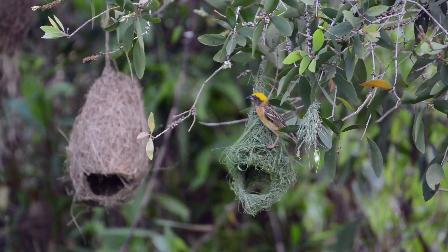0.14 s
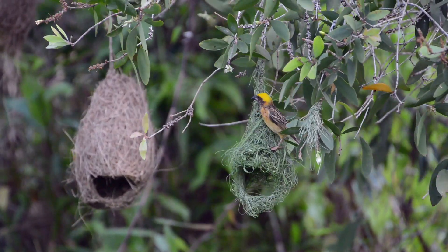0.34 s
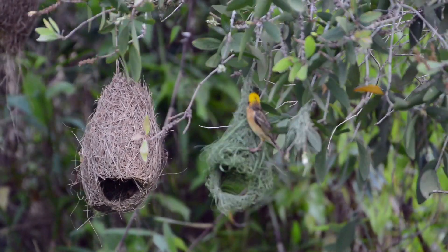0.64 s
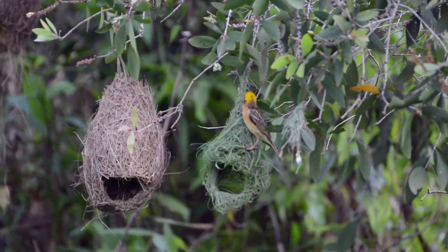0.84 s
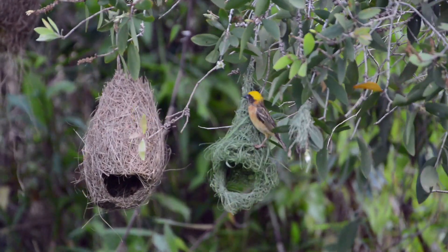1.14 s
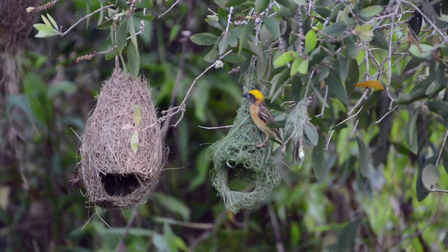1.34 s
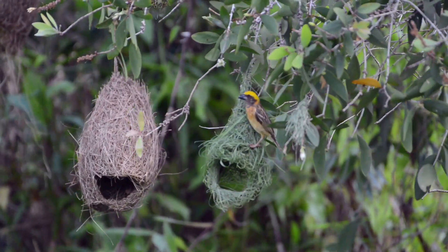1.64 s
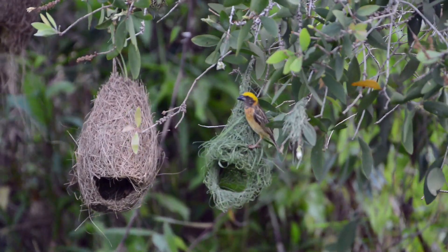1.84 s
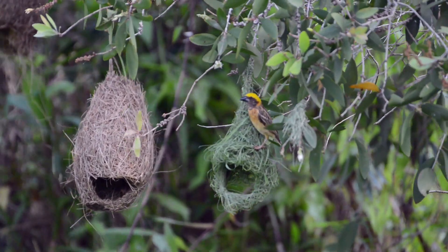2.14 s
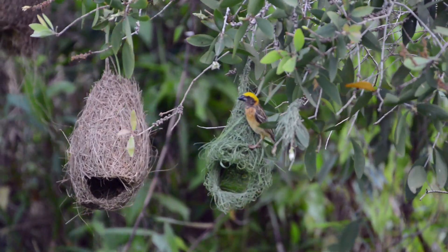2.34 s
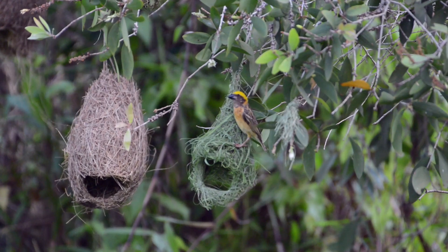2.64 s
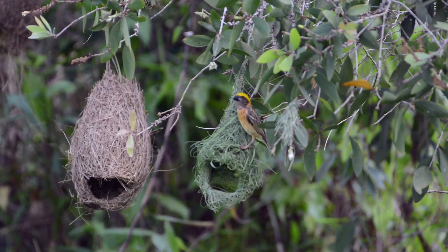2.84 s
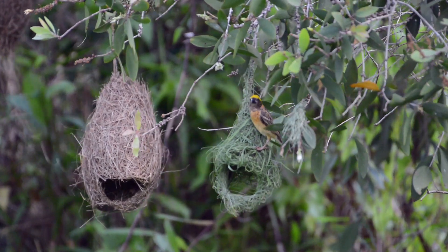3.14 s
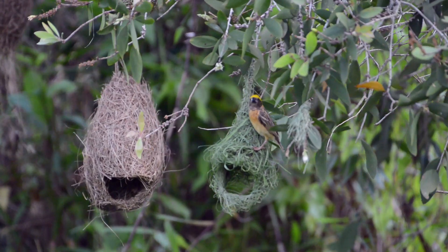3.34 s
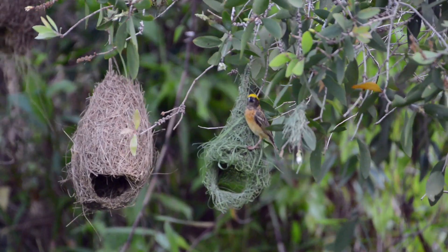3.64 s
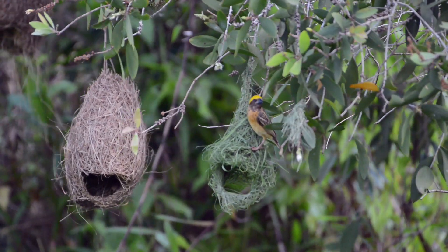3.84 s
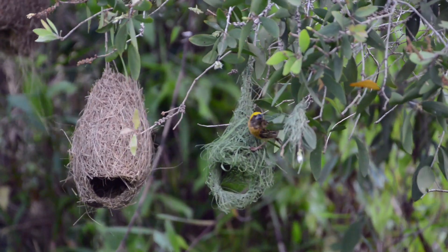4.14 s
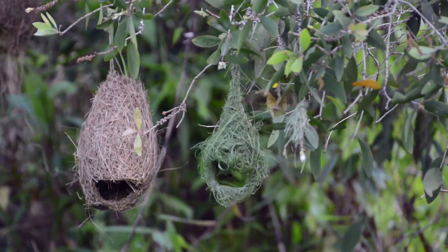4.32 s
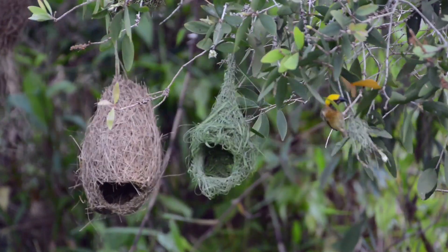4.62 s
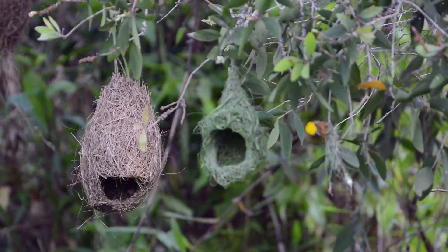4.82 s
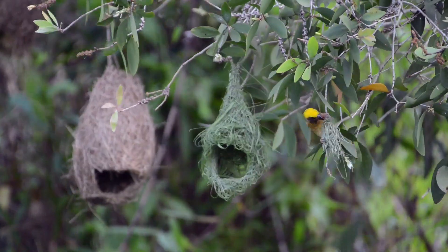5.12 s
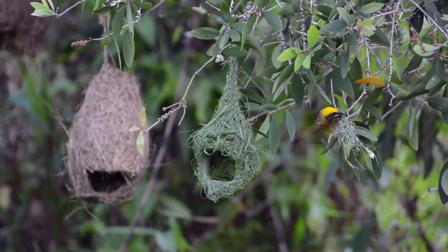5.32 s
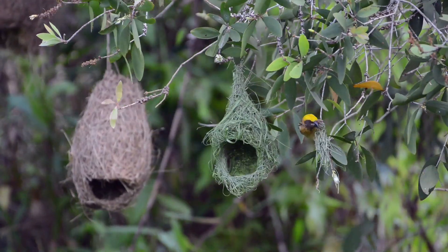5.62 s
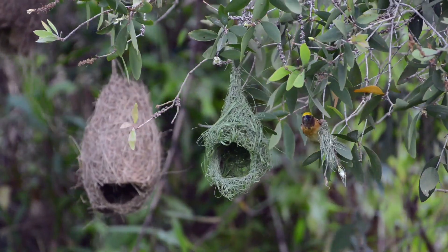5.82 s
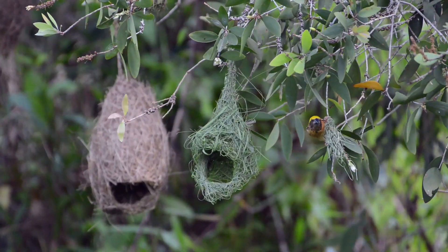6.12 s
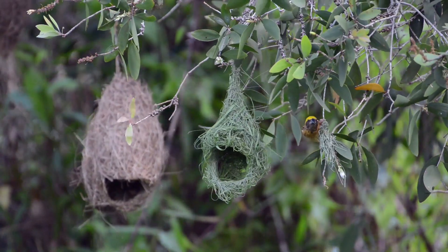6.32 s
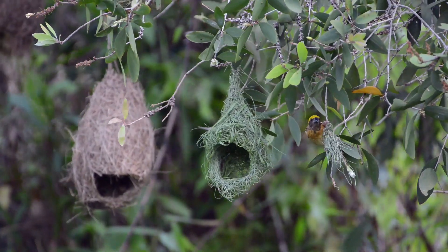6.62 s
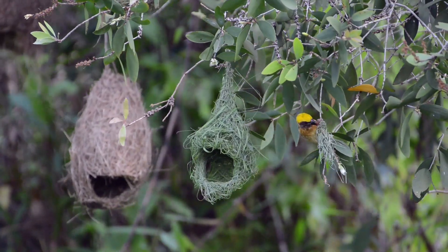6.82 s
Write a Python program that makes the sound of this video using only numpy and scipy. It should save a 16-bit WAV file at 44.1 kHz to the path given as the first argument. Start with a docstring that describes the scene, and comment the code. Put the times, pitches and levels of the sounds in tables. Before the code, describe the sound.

Close, piercing bird calls arch and slur downward about five times a second, mixed with buzzy notes, low whistles and faint mechanical clicking.

```python
"""In a leafy tree a weaverbird colony chatters: one thin call, an arch and a downslur, repeats about five times a second.
Gliding tones sing the calls, buzzy downslurs and lower whistles; trains of ringing pulses make harsh rasps.
Shaped noise gives the shrill of insects and a soft outdoor rush; far birds twitter in random chirps.
Dry ticks and a short rattle, likely a lens focusing, are knocks that ring damped modes; soft low bumps are damped sines."""
import sys
import numpy as np
from scipy import signal
from scipy.fft import rfft, irfft, next_fast_len
from scipy.io import wavfile
from scipy.ndimage import map_coordinates

SR = 44100
rng = np.random.default_rng(int(sys.argv[2]) if len(sys.argv) > 2 else 0)


def materialize(psi):
    """Save the field psi as 16-bit PCM at rate SR to the path in sys.argv[1].

    A 1-D psi becomes a single channel; in a 2-D psi each row is a channel.
    """
    bounded = np.clip(np.atleast_2d(psi).T, -1, 1)
    quanta = np.round(bounded * 32767).astype(np.int16)
    wavfile.write(sys.argv[1], SR, quanta)


N = 307377


def amp(db):
    """Logarithmic level: decibels become an amplitude gain."""
    return 10 ** (np.asarray(db) / 20)


def unit(x):
    """Power normalisation: scale to rms 1."""
    return x / np.sqrt(np.mean(x ** 2) + 1e-20)


def add(track, s, sound):
    """Superposition: mix a sound into a track at s seconds."""
    start = max(round(s * SR), 0)
    part = track[start:start + len(sound)]
    part += sound[:len(part)]


def wobble(rate, size=N):
    """Band-limited fluctuation: a smooth random curve with rate knots a second."""
    knots = rng.standard_normal(size // 20)
    return map_coordinates(knots, [np.arange(size) * rate / SR], mode="wrap")


def filtered(x, gain):
    """Linear filtering: multiply the spectrum by a gain that depends on frequency."""
    m = next_fast_len(N + 8192)
    return irfft(rfft(x, m) * gain(np.fft.rfftfreq(m, 1 / SR)), m)[:N]


def noise(spectrum):
    """Spectral shaping: white noise takes a (frequency, level) spectrum and is scaled to rms 1."""
    f, db = np.transpose(spectrum)
    log_f = np.log(f)
    return unit(filtered(rng.standard_normal(N), lambda hz: amp(np.interp(np.log(hz + 1), log_f, db))))


def breeze():
    """Amplitude-modulated noise: a soft rush of air over a lumpy low rumble."""
    # spectral densities, relative: (frequency [Hz], level per hertz [dB])
    air = [(25, -46), (80, -1), (280, -2.5), (1000, -4.5), (1350, -9), (3200, -18), (5000, -34.5),
           (8000, -72)]
    low_air = [(30, -19), (60, -7.5), (110, 1.5), (150, 2), (210, -18.5), (400, -37.5)]
    # slow course of the air's strength: (time [s], rumble level [dB], rush level [dB])
    strength = [(0, -60, -59.2), (1.8, -60.5, -56.8), (2.58, -56.5, -53.8), (2.75, -59.5, -56.3),
                (3.8, -62.5, -57.2), (4.3, -56.5, -56), (5.3, -61, -58.5), (6.1, -56, -55),
                (6.9, -63, -57.5)]
    s, rumble_db, rush_db = np.transpose(strength)
    t = np.arange(N) / SR
    rumble = amp(np.interp(t, s, rumble_db) + 3.1 * wobble(20)) * noise(low_air)
    rush = amp(np.interp(t, s, rush_db) + 1.8 * wobble(13)) * noise(air)
    return rumble + rush


def insects():
    """Summed incoherent sources: many distant insects merge into a high noise band that shimmers slightly."""
    # spectral density, relative: (frequency [Hz], level per hertz [dB])
    shrill = [(3000, -18.5), (5500, -20.5), (6300, -8), (6900, 0), (7700, 1.5), (8500, -10), (9400, -9.5),
              (10200, -26), (13500, -26), (15500, -14.5)]
    return amp(-54 + wobble(2.27) + 2.5 * wobble(60)) * noise(shrill)


def thumps(body_hz=105, t60=0.049):
    """Damped oscillation: each soft low bump is a few decaying cycles."""
    # bumps: (time [s], strength [dB])
    bumps = [(2.559, -26.5), (3.301, -26.5), (4.184, -27)]
    track, t = np.zeros(N), np.arange(SR // 5) / SR
    onset = 1 - np.exp(-t / 0.007)
    for s, db in bumps:
        add(track, s, amp(db - 60 * t / t60) * onset * np.sin(2 * np.pi * body_hz * t))
    return track


def barrel(attack_s=0.00054, scatter_db=3, detune=0.015):
    """Modal vibration: the lens barrel rings as damped sines, each strength and pitch scattered anew."""
    # modes about which the scatter falls: (frequency [Hz], level [dB], 60 dB decay time [s])
    modes = [(3110, -14, 0.0043), (4010, -25.5, 0.019), (4910, 0, 0.013), (5860, 2.5, 0.013),
             (6440, -31, 0.0098), (6850, -2, 0.013), (8480, -12, 0.016), (9740, -18.5, 0.013),
             (10940, 2.5, 0.003), (11820, -9, 0.0094), (12630, -5.5, 0.0076)]
    t = np.arange(SR // 20) / SR
    ring = np.zeros(len(t))
    for k, (hz, db, t60) in enumerate(modes):
        envelope = amp(db + scatter_db * rng.normal() - 60 * t / t60)
        mode_hz = hz * (1 + detune * rng.normal())
        ring += (-1) ** k * envelope * np.sin(2 * np.pi * mode_hz * t)  # neighbours start in opposite phase
    ring = ring * (1 - np.exp(-(t / attack_s) ** 2))
    return ring / np.linalg.norm(ring)


def ticks(knock_db=8, chatter_db=-20, chatter_t60=0.046, housing_db=-40, housing_t60=0.25):
    """Impact excitation: each drive step is a knock, gear chatter and faint housing ring that excite the barrel."""
    # single steps of the focus drive: (time [s], strength [dB])
    steps = [(.1394, -19.5), (.187, -18.5), (.2716, -17), (.375, -17.5), (.441, -26.5), (.448, -30),
             (.4872, -20.5), (.5752, -19), (.6175, -15), (.6268, -16.5), (.648, -16), (.654, -18.5),
             (.6657, -21.5), (.6901, -17), (.8081, -18.5), (4.4077, -22.5), (4.4595, -17), (4.5406, -19.5),
             (4.6468, -20), (4.741, -24.5), (4.7947, -15), (4.8795, -13), (4.887, -22), (4.9342, -18.5),
             (5.187, -22), (5.2976, -21)]
    # a rattle is a run of steps on these beats of the drive's clock: (beat [clock periods])
    beats = (0, 2, 5, 7, 11, 14, 17, 18, 21, 24, 27, 29, 32, 34, 37, 38, 40, 42, 45, 47, 50)
    clock_hz, run_start_s, run_db = 332.5, 4.9853, -15
    track, t = np.zeros(N), np.arange(SR // 10) / SR
    run = [(run_start_s + beat / clock_hz, run_db + 2 * rng.normal()) for beat in beats]
    decay = amp(chatter_db - 60 * t / chatter_t60) + amp(housing_db - 60 * t / housing_t60)
    for s, db in list(steps) + run:
        blow = amp(knock_db) * (t == 0) + decay * rng.standard_normal(len(t))
        add(track, s, amp(db) * signal.fftconvolve(blow, barrel()))
    return track


def foliage(x, near_db, far_db, near_t60, far_t60=0.42, build_up=0.0045):
    """Multiple scattering: near leaves smear and far trees add a tail, as decaying noise that changes every 0.2 s."""
    t, hop = np.arange(SR // 2) / SR, SR // 5
    window = signal.get_window("hann", 2 * hop)  # overlapping stretches crossfade
    padded = np.pad(x, (hop, 2 * hop))
    out = np.zeros(len(padded))
    for start in range(0, N + hop, hop):
        near, far = rng.standard_normal((2, len(t))) * (1 - np.exp(-t / build_up))
        near_echo = amp(near_db) * unit(near * amp(-60 * t / near_t60))
        far_echo = amp(far_db) * unit(far * amp(-60 * t / far_t60))
        echo = (near_echo + far_echo) / np.sqrt(len(t))
        add(out, start / SR, signal.fftconvolve(padded[start:start + 2 * hop] * window, echo))
    return x + out[hop:hop + N]


def sing(syllables, waver, flutter_db, trill_hz, trill_depth, swell, skew):
    """Frequency modulation: each (time, length, pitch contour, level) syllable is one smoothly gliding tone."""
    edge_s = 0.0014  # ramp at either end of a note
    track, t = np.zeros(N), np.arange(SR // 6) / SR
    for s, length, contour, db in syllables:
        u = np.clip(t / max(length, .005), 0, 1)
        points = np.linspace(0, 1, len(contour))
        glide = np.polyval(np.polyfit(points, contour, len(contour) - 1), u)
        # a fast, slightly uneven trill of the syrinx roughens the tone
        trill = np.sin(2 * np.pi * trill_hz * t + wobble(67.8, size=len(t)))
        pitch = glide * (1 + waver * wobble(3 * trill_hz, size=len(t)) + trill_depth * trill)
        # the note swells once (early when skew is under 1), with a quick flutter on top
        flutter = flutter_db * np.tanh(wobble(128.6, size=len(t)))
        pressure = np.abs(np.sin(np.pi * u ** skew)) ** swell * amp(db + flutter)
        edges = np.clip(np.minimum(t, length - t) / edge_s, 0, 1)
        add(track, s, edges * pressure * np.sin(2 * np.pi * np.cumsum(pitch) / SR))
    return track


def notes(rows, contour):
    """Shared gesture: (time, length, level) rows all follow one pitch contour."""
    return [(s, length, contour, db) for s, length, db in rows]


def far_chirps(count, centre_hz, spread, level_db):
    """Random point process: far birds chirp at chance times, each on a falling pitch contour."""
    rows = []
    for s, (size, tune, loud) in zip(rng.uniform(0, N / SR, count), rng.standard_normal((count, 3))):
        hz = centre_hz * np.exp(spread * tune)
        rows.append((s, 0.036 * np.exp(0.53 * size), (hz, hz, 0.9 * hz), level_db + 2 * loud))
    return rows


def chatter():
    """Reverberant masking: scattering almost buries the direct sound of dense high and sparse low chirps."""
    high = far_chirps(count=170, centre_hz=7550, spread=.055, level_db=-53)
    low = far_chirps(count=60, centre_hz=3000, spread=.25, level_db=-69)
    sung = sing(high + low, waver=0.009, flutter_db=8, trill_hz=121, trill_depth=0.0045, swell=0.6, skew=.8)
    return foliage(sung, near_db=1.5, far_db=-9.5, near_t60=0.11)


def pipes():
    """Near-steady oscillation: held whistles sink slightly, and warbles arch, with a weak trill."""
    # held whistles: (time [s], length [s], mid pitch [Hz], relative level [dB])
    held = [(1.154, .12, 2660, -46), (1.94, .035, 4080, -52), (1.965, .075, 3610, -33),
            (2.76, .14, 2970, -61), (4.696, .055, 3690, -50), (4.945, .055, 2680, -57),
            (5.176, .1, 2460, -53), (5.655, .04, 3330, -51), (6.234, .025, 2400, -44),
            (6.856, .082, 2980, -50)]
    # wavering arched whistles: (time [s], length [s], relative level [dB])
    warbles = [(6.112, 0.068, -48), (6.46, .088, -48.5)]
    # their evenly spaced contour points: (pitch [Hz])
    warble_hz = (3700, 3890, 4050, 3930, 3400)
    sag = 0.009  # share of pitch above the middle at the start and below it at the end
    rows = [(s, length, (hz * (1 + sag), hz * (1 - sag)), db) for s, length, hz, db in held]
    sung = sing(rows + notes(warbles, warble_hz),
                waver=0.005, flutter_db=6, trill_hz=92.3, trill_depth=0.011, swell=0.45, skew=1)
    return amp(2.5) * foliage(sung, near_db=-7.0, far_db=-10.0, near_t60=0.25)


def slides():
    """Continuous glide: long slides fall and level out, and soft notes dip and rise again."""
    # slides: (time [s], length [s], start scale [Hz], end scale [Hz], level [dB])
    falls = [(0.769, 0.085, 5150, 3174, -43), (0.942, 0.092, 3650, 2740, -58),
             (3.389, 0.09, 4300, 2840, -48)]
    # contour points: (share of the way from end scale (0) to start scale (1))
    shape = (0.98, .66, .29, .1, 0.022)
    # dipping notes: (time [s], length [s], level [dB])
    dips = [(1.858, 0.053, -49), (2.048, 0.044, -41), (2.304, 0.056, -38), (3.316, 0.058, -39.5),
            (3.836, 0.031, -43), (4.14, 0.06, -47.5), (6.079, 0.033, -42.5), (6.422, 0.073, -42.5)]
    # their evenly spaced contour points: (pitch [Hz])
    dip_hz = (6200, 5300, 6050)
    rows = [(s, length, end + (start - end) * np.array(shape), db) for s, length, start, end, db in falls]
    sung = sing(rows + notes(dips, dip_hz),
                waver=0.015, flutter_db=6, trill_hz=109, trill_depth=0.005, swell=0.23, skew=0.85)
    return foliage(sung, near_db=-3.5, far_db=-17.5, near_t60=0.12)


def whistles():
    """Rapid frequency sweep: low voices drop, hook, or flick upward after a faint rising peep."""
    # steep drops: (time [s], length [s], level [dB])
    drops = [(1.289, 0.035, -34), (1.429, 0.043, -37.5), (2.003, 0.033, -44.5), (2.288, 0.04, -35.5),
             (3.51, 0.03, -40), (3.763, 0.034, -38.5), (4.773, 0.035, -50.5), (6.877, 0.047, -47)]
    # hooks that plunge and curl up: (time [s], length [s], top scale [Hz], level [dB])
    hooks = [(3.404, 0.03, 3140, -45), (3.559, 0.051, 3280, -37), (3.724, 0.055, 3400, -37),
             (3.898, 0.054, 3600, -35.5), (4.076, .056, 3700, -34.5), (4.254, 0.034, 3700, -36.5)]
    # quick flicks that lead into a hook: (time [s], length [s], level [dB])
    flicks = [(3.887, 0.0088, -43), (4.062, 0.0053, -44), (4.234, .01, -45.5)]
    # evenly spaced contour points of drop, flick and peep: (pitch [Hz])
    drop_hz = (2614, 2086, 1705)
    flick_hz = (2350, 2920, 3400)
    peep_hz = (1820, 2030, 2220)
    # hook contour points: (share of the way from low_hz (0) to top scale (1))
    hook = (0.98, .52, .13, 0.053, 0.49)
    low_hz = 2226
    peep_s, peep_db = 0.024, -8.5  # length, and level relative to the flick
    curls = [(s, length, low_hz + (top - low_hz) * np.array(hook), db) for s, length, top, db in hooks]
    peeps = [(s - peep_s, peep_s, db + peep_db) for s, _, db in flicks]
    rows = notes(drops, drop_hz) + curls + notes(flicks, flick_hz) + notes(peeps, peep_hz)
    sung = sing(rows, waver=0.012, flutter_db=6, trill_hz=110, trill_depth=0.013, swell=0.45, skew=0.88)
    return foliage(sung, near_db=1.5, far_db=-13, near_t60=0.09)


def rasps(jitter=0.16, pulse_s=0.0005, bow=0.12, uneven_db=4):
    """Source and filter: a fast, uneven pulse train rings two throat resonances that rise and sink again."""
    # rasps: (time [s], length [s], mean rate [pulses/s], mean lower resonance [Hz], rms level [dB])
    trains = [(3.251, 0.02, 660, 3700, -45.5), (5.473, 0.043, 750, 4000, -41.5),
              (5.587, 0.055, 520, 4140, -37.5), (5.709, 0.02, 2000, 3840, -45.5),
              (5.734, 0.017, 2100, 3720, -45.5), (5.877, 0.0195, 620, 3700, -46.5)]
    upper_ratio, upper_db = 1.46, -7.5  # upper resonance, relative to the lower
    track, t = np.zeros(N), np.arange(-SR // 500, SR // 500) / SR
    for s, length, rate, hz, db in trains:
        gaps, sizes = rng.standard_normal((2, 256))
        times = np.cumsum(np.abs(1 + jitter * gaps)) / rate
        times = times[times < length, None]
        effort = np.sin(np.pi * times / length)
        phase = 2 * np.pi * hz * (1 + bow * (effort - 2 / np.pi)) * t  # 2/pi is the mean effort
        rings = np.exp(-(t / pulse_s) ** 2) * (np.cos(phase) + amp(upper_db) * np.cos(upper_ratio * phase))
        rings = rings * effort ** .5 * amp(uneven_db * sizes[:len(times), None])
        places = (times * SR).astype(int) + np.arange(len(t))
        add(track, s, amp(db) * unit(np.bincount(places.ravel(), rings.ravel())))
    return foliage(track, near_db=-1, far_db=-16.5, near_t60=0.088)


def buzzes():
    """Modulation sidebands: a deep 190 Hz trill spreads each falling tone into a buzz."""
    # downslurs: (time [s], length [s], relative level [dB])
    downslurs = [(.812, 0.072, -47), (1.431, 0.064, -42.5), (1.565, 0.081, -42), (2.244, 0.059, -41),
                 (2.39, 0.08, -40.5), (3.192, 0.055, -44), (3.345, 0.054, -41.5), (4.056, 0.093, -45.5),
                 (4.502, 0.057, -36), (4.626, .082, -42.5), (5.416, 0.062, -43), (5.828, 0.087, -41),
                 (5.948, 0.0706, -40.5), (6.553, 0.066, -37.5)]
    # their evenly spaced contour points: (pitch [Hz])
    buzz_hz = (4864, 4995, 4795, 4490, 3700)
    sung = sing(notes(downslurs, buzz_hz),
                waver=0.012, flutter_db=5.0, trill_hz=190, trill_depth=0.025, swell=0.7, skew=0.8)
    return amp(3.5) * foliage(sung, near_db=-2.5, far_db=-6.5, near_t60=0.068)


def call_syllables():
    """Two-voiced source: each call scoops up, arches over in both halves of the syrinx and runs into its slur."""
    # calls: (time [s], arch length [s], slur length [s], crest scale [Hz], mid-slur pitch [Hz],
    #         end pitch [Hz], relative arch level [dB], slur level [dB])
    chirps = [(.075, 0.059, 0.035, 8380, 6960, 6400, -36.5, -27),
              (.185, 0.052, .027, 8710, 6590, 6300, -33, -21),
              (.322, 0.061, 0.056, 8200, 6750, 5850, -36.5, -22),
              (.418, 0.055, 0.031, 8330, 6400, 5600, -30.5, -25.5),
              (.58, 0.055, 0.037, 8500, 6590, 6200, -30, -23.5),
              (.81, 0.055, 0.033, 8420, 6900, 6000, -35.5, -31.5),
              (.885, 0.036, 0.071, 8680, 6650, 5600, -46, -27.5),
              (.925, 0.063, 0.011, 8520, 6850, 6440, -29.5, -24.5),
              (1.281, 0.031, 0.045, 8440, 6890, 6050, -28.5, -21),
              (1.426, 0.035, 0.076, 8220, 6690, 5860, -35, -24),
              (1.53, .039, 0.036, 8420, 7040, 6500, -27.5, -31.5),
              (1.798, 0.04, 0.027, 8310, 6740, 6340, -37.5, -39),
              (1.898, 0.061, 0.046, 8000, 6920, 5800, -30, -26),
              (2.143, 0.031, 0.037, 8190, 6600, 6230, -26.5, -30),
              (2.405, 0.056, 0.027, 7510, 6400, 5700, -27, -26),
              (2.539, 0.042, 0.023, 8270, 6850, 6420, -35, -25.5),
              (2.708, 0.063, .023, 8560, 6400, 5880, -34, -26),
              (2.924, .046, 0.024, 8480, 6870, 7050, -23, -21.5),
              (3.015, .02, 0.023, 7390, 6410, 5800, -40, -25),
              (3.249, .022, .015, 8530, 7550, 7000, -31, -62),
              (3.342, 0.036, .036, 8480, 6900, 6200, -27, -21),
              (3.49, .046, 0.056, 8450, 6390, 5810, -41.5, -21.5),
              (3.82, .04, 0.041, 8620, 6740, 6000, -24, -20.5),
              (4.158, 0.039, 0.069, 8310, 6620, 5610, -40, -21.5),
              (4.232, 0.049, 0.037, 8750, 6850, 6240, -29, -25.5),
              (4.44, 0.026, 0.016, 7740, 6770, 5950, -42, -19),
              (4.698, 0.042, 0.043, 8780, 6940, 6400, -28.5, -32),
              (4.818, 0.077, 0.029, 8650, 6410, 5800, -35.5, -27.5),
              (5.08, 0.034, 0.018, 8760, 6230, 5950, -26.5, -25),
              (5.31, 0.06, 0.056, 8600, 6660, 5580, -25.5, -28),
              (5.578, 0.039, 0.022, 8770, 7770, 7340, -27.5, -26.5),
              (5.672, 0.031, 0.063, 8650, 6760, 5880, -37.5, -25.5),
              (5.932, 0.061, 0.022, 8920, 7330, 6800, -31.5, -32.5),
              (6.07, 0.045, 0.059, 8550, 6620, 5720, -30.5, -28),
              (6.313, 0.043, 0.041, 8900, 7070, 6600, -29.5, -25),
              (6.512, 0.041, 0.064, 8680, 6850, 5850, -38.5, -23.5),
              (6.82, .041, 0.04, 9000, 6960, 6980, -31.5, -30)]
    # evenly spaced contour points of the arch: (share of crest scale)
    arch_shape = (0.93, 1, 0.95, 0.92)
    # contour points of the soft rise into the arch: (share of crest scale)
    scoop_shape = (.82, 1)
    scoop_s, scoop_db = 0.015, -10  # length, and level relative to the arch
    undertone, undertone_db = .92, -16.5  # second voice: pitch share, relative level
    entry_share = 1.074  # where the slur starts, as a share of mid-slur pitch
    shoulder_s = 0.0794  # a slur this long lingers on a flat shoulder; shorter ones fall straighter
    arches, slurs = [], []
    for s, arch_s, slur_s, crest, middle, end, arch_db, slur_db in chirps:
        entry = entry_share * middle
        arch = np.append(crest * np.array(arch_shape), (entry + crest * undertone) / 2)
        steep = np.clip(1 - slur_s / shoulder_s, 0, .5)
        upper_fall = middle + steep * (entry - middle)
        lower_fall = middle + (steep + .5) / 2 * (end - middle)
        arches += [(s - scoop_s / 2, scoop_s, crest * np.array(scoop_shape), arch_db + scoop_db),
                   (s, arch_s, arch, arch_db),
                   (s, arch_s, undertone * arch, arch_db + undertone_db)]
        slurs.append((s + arch_s, slur_s, (entry, upper_fall, middle, lower_fall, end), slur_db))
    return arches, slurs


def calls():
    """Direct-to-reverberant balance: direct sound leads in arches, slurs and squeaks, so they stand close and clear."""
    # short steep squeaks: (time [s], length [s], level [dB])
    squeaks = [(1.313, 0.015, -30), (2.378, 0.031, -35.5), (5.61, 0.047, -35), (6.675, 0.014, -35.5)]
    # their evenly spaced contour points: (pitch [Hz])
    squeak_hz = (7000, 6400, 5650)
    arches, slurs = call_syllables()
    arches = sing(arches, waver=0.0046, flutter_db=7.0, trill_hz=126.0, trill_depth=0.003, swell=0.99, skew=0.49)
    slurs = sing(slurs + notes(squeaks, squeak_hz),
                 waver=0.0086, flutter_db=3.5, trill_hz=117.0, trill_depth=0.0031, swell=0.67, skew=0.79)
    return (amp(-1.86) * foliage(arches, near_db=-3.0, far_db=-37.0, near_t60=0.1)
            + foliage(slurs, near_db=-7, far_db=-45.0, near_t60=0.092))


def scene():
    """Superposition: the colony and its surroundings add up in mono."""
    birds = chatter() + pipes() + slides() + whistles() + rasps() + buzzes() + calls()
    return (breeze() + insects() + thumps() + ticks() + birds)[None]


def record(dry):
    """Band limiting: the camera keeps only what lies below 15850 Hz."""
    return filtered(dry[0], lambda hz: hz < 15850)[None]


dry = scene()
out = record(dry)
materialize(out)
```